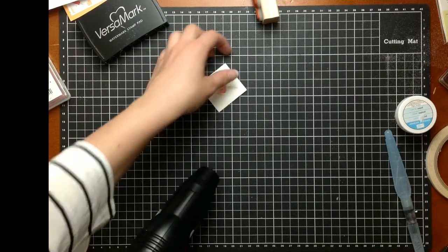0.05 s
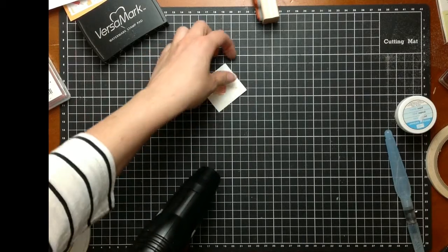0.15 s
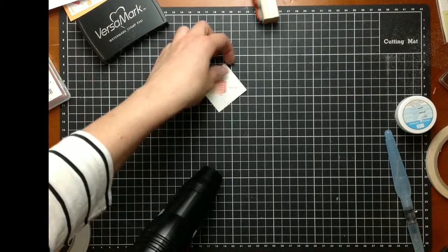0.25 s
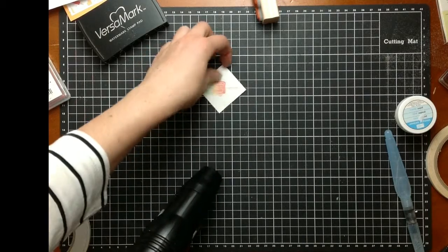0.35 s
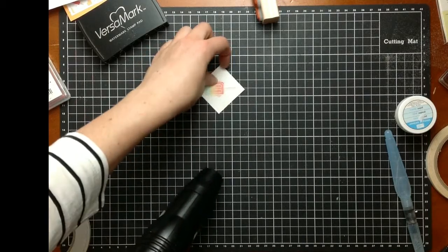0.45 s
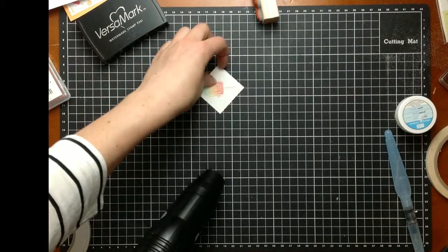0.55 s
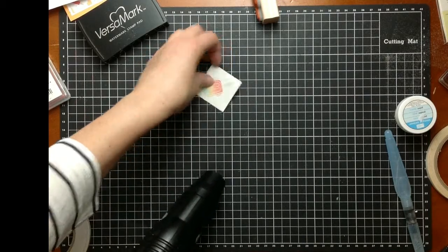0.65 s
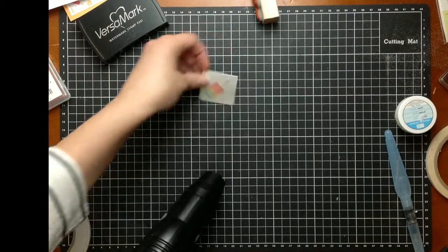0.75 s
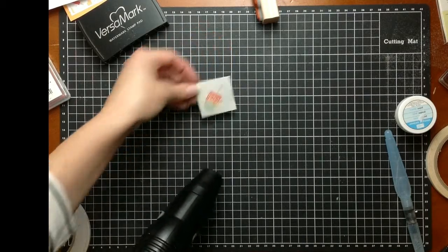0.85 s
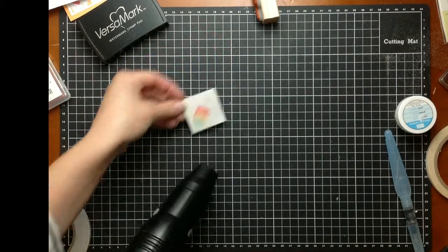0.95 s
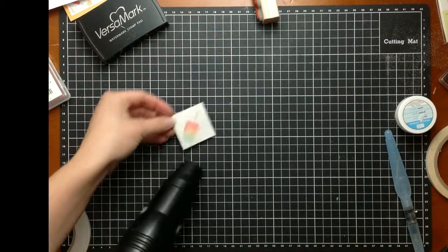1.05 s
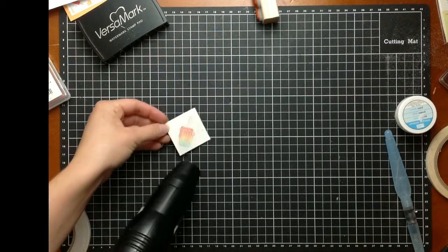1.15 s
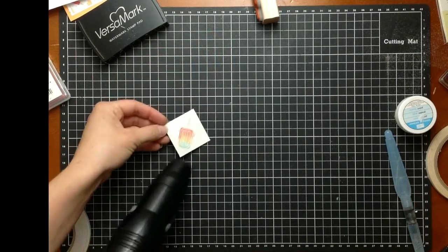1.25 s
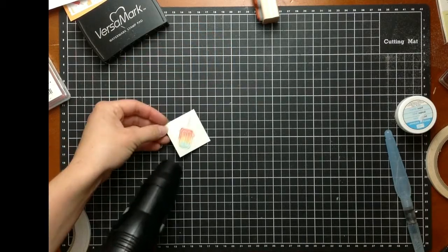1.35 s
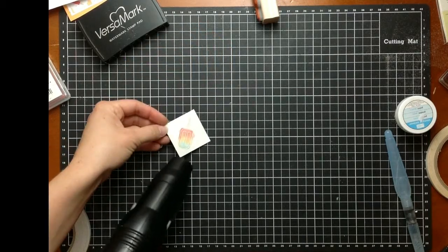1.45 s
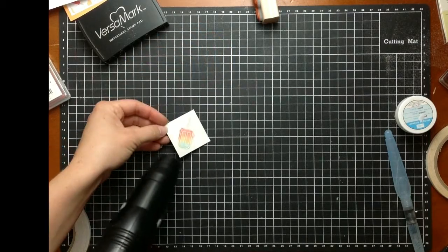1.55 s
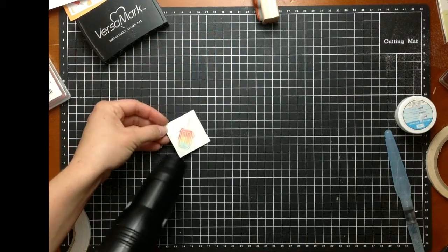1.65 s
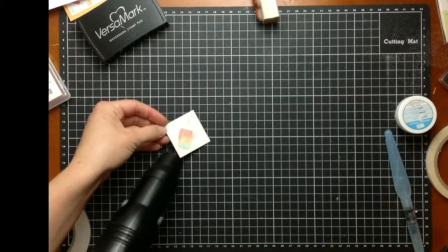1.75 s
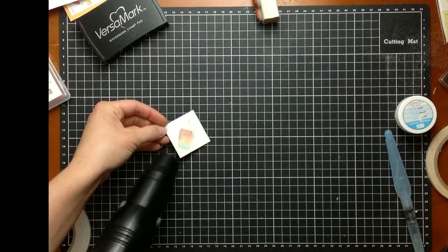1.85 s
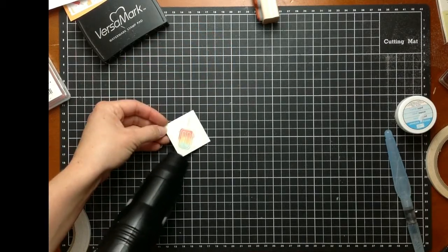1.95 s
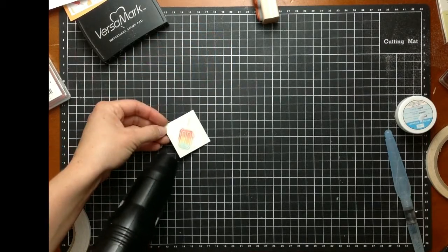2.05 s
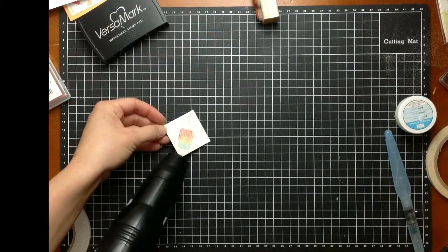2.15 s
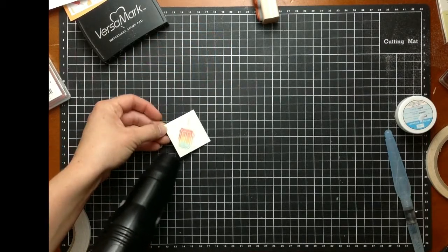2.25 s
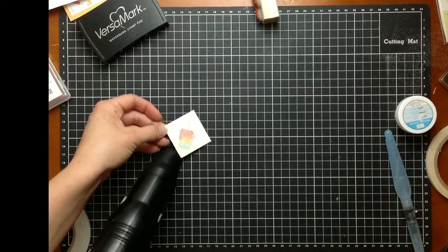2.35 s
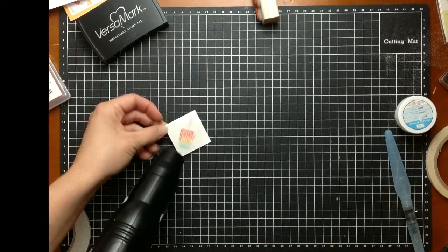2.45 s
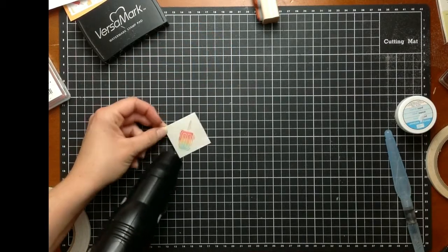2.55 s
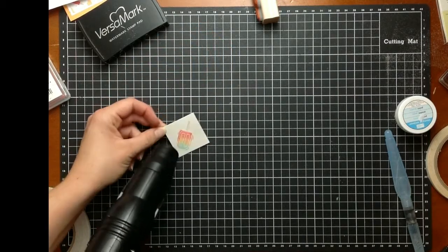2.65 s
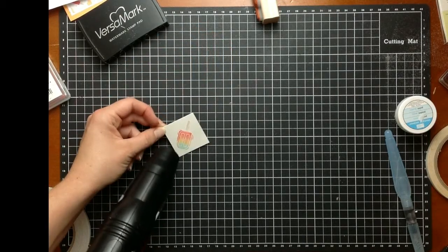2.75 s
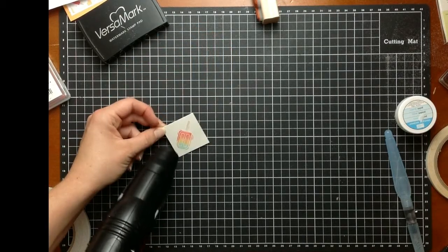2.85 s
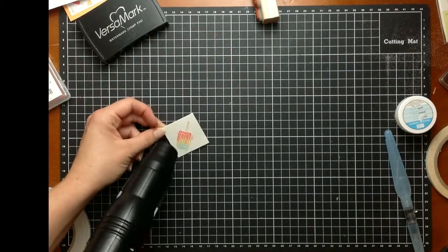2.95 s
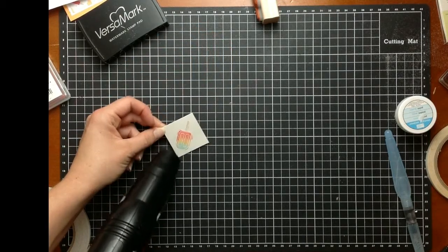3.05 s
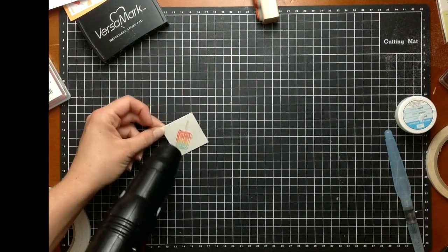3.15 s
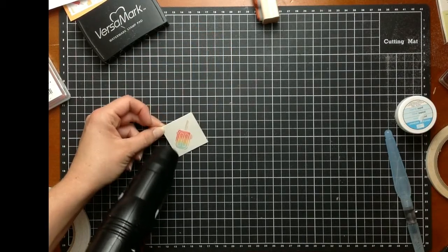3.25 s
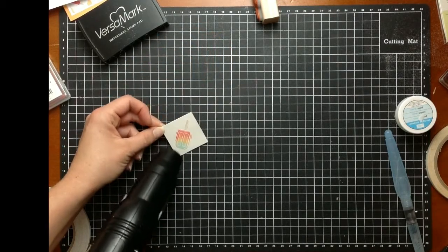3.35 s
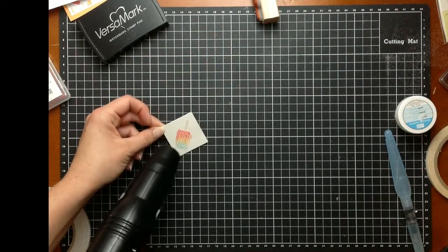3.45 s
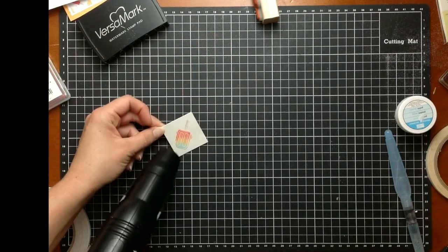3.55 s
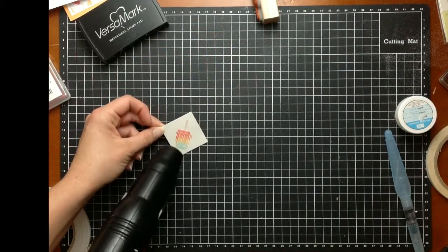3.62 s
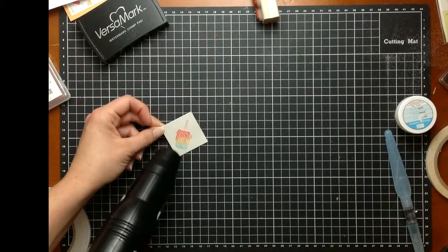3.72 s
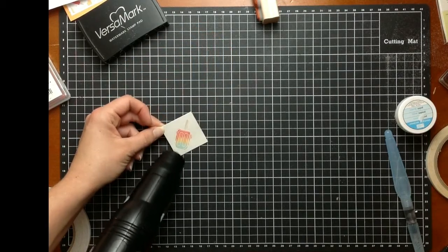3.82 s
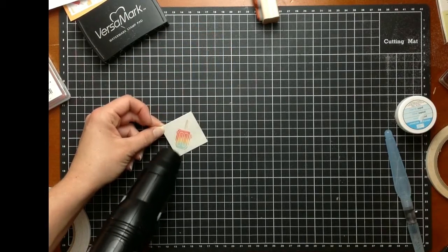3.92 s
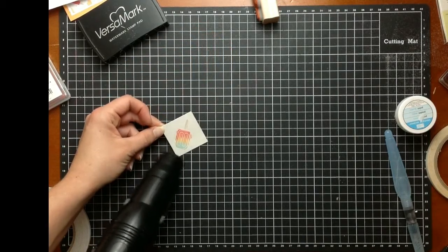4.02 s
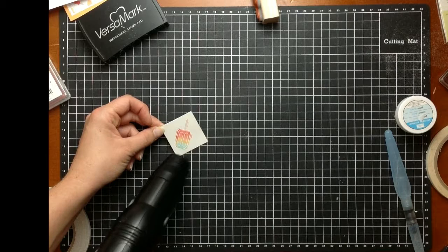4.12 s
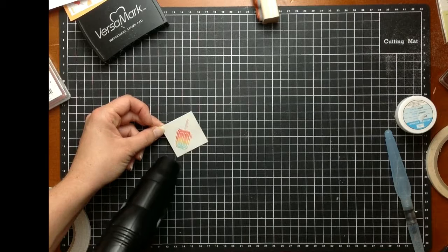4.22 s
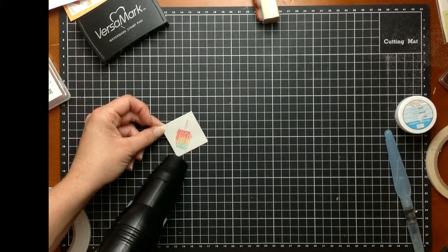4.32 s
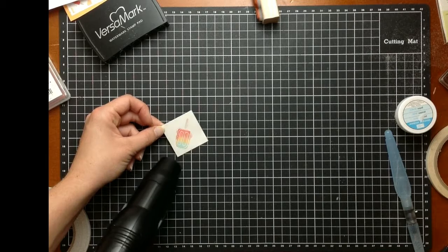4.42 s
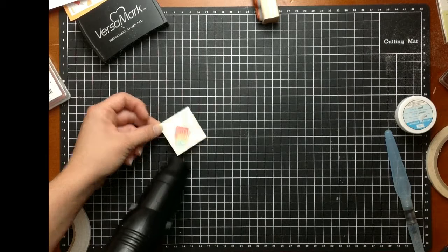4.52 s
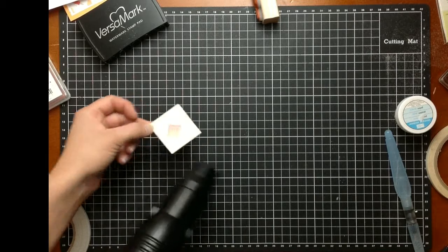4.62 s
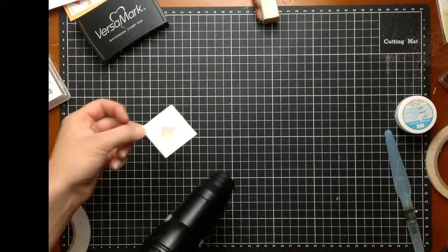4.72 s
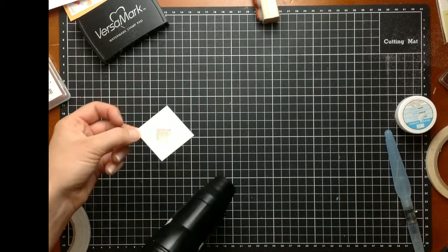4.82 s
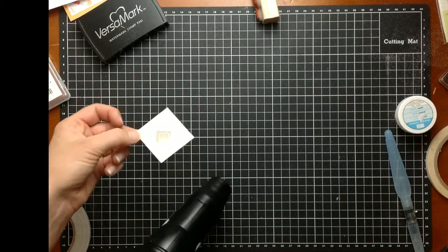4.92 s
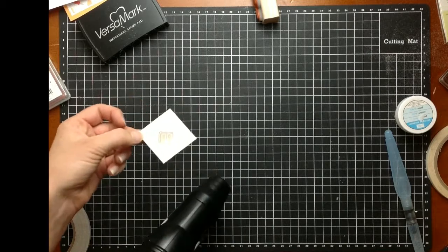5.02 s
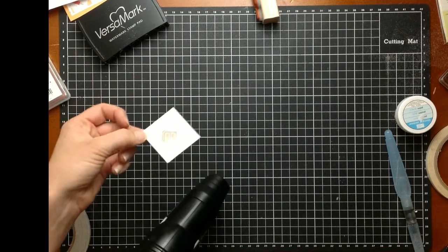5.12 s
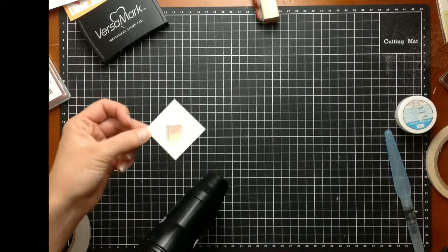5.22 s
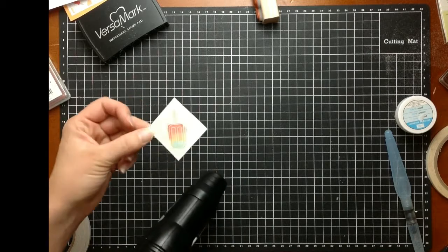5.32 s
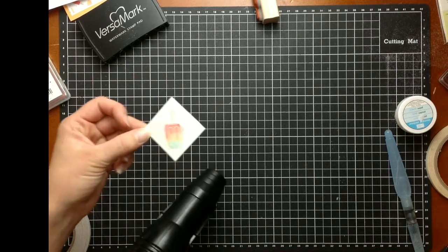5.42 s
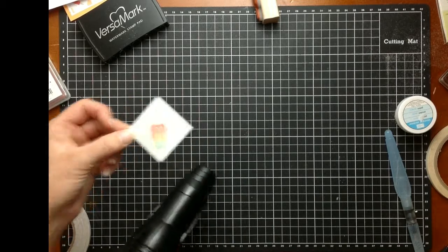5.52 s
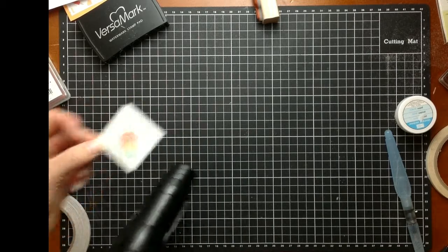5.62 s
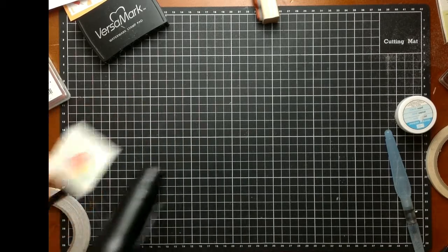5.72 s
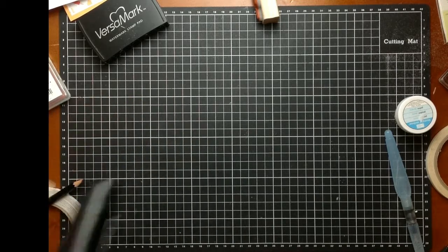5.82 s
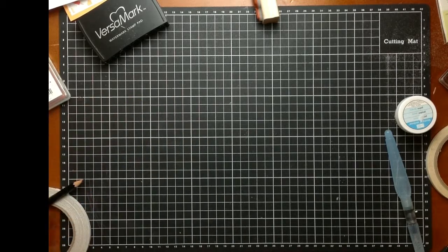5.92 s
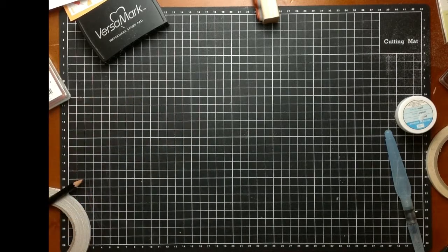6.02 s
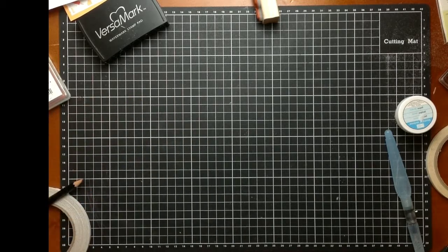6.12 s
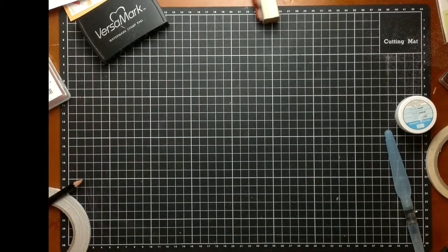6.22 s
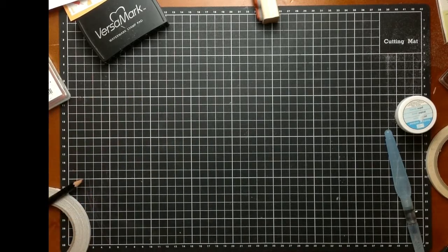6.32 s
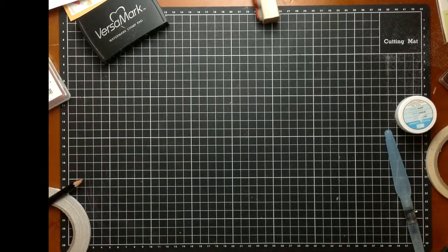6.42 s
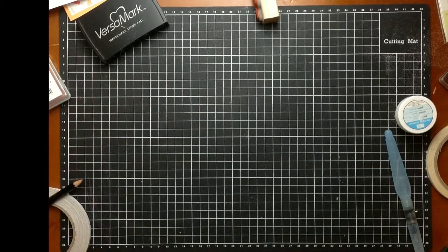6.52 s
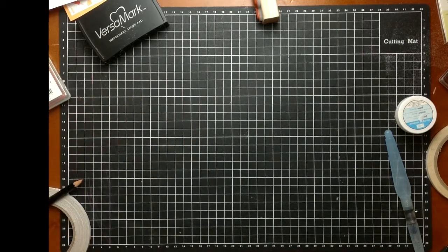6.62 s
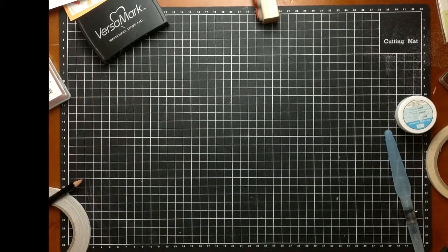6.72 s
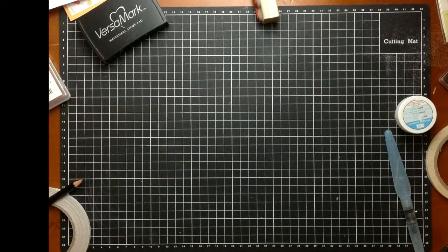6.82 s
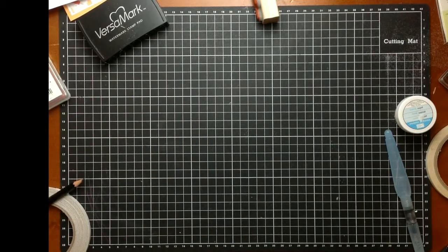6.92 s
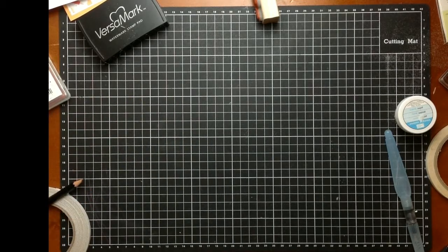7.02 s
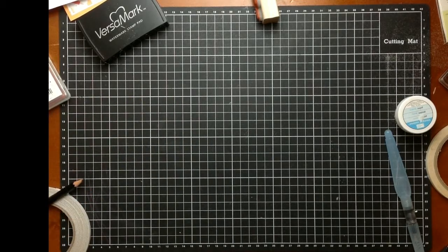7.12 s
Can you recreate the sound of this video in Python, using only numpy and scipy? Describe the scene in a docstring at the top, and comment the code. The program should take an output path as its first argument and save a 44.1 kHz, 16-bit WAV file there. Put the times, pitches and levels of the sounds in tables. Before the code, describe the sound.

Steady airy roar, bright hiss and fan whine of a small heat blower, gliding down to quiet before plastic clacks and knocks.

```python
"""A craft heat tool blows at a scrap of paper: air roars in its barrel, the jet hisses, a small fan whines.
Resonance colours the roar; echoes recolour the hiss as the nozzle meets the paper and leaves it; the whine
is a harmonic series on the shaft rate. Switched off, the fan coasts to rest and its pitch glides down.
The tool is put aside: a faint rub, then plastic clacks (clicks, rattle, damped rings) and knocks on the table
(damped modes), in a small, lively room over steady quiet noise."""
import sys
import numpy as np
from scipy import signal
from scipy.fft import rfft, irfft, next_fast_len
from scipy.io import wavfile
from scipy.ndimage import map_coordinates

SR = 44100
rng = np.random.default_rng(int(sys.argv[2]) if len(sys.argv) > 2 else 0)


def output_pcm(signal):
    """Save a mono or channel-first signal as 16-bit PCM at the path in sys.argv[1].

    Samples are clipped to [-1, 1] before scaling.
    """
    pcm = np.clip(np.atleast_2d(signal).T, -1, 1) * 32767
    wavfile.write(sys.argv[1], SR, np.round(pcm).astype(np.int16))


N = 316197


def amp(db):
    """Level law: decibels to amplitude gain."""
    return 10 ** (np.asarray(db) / 20)


def unit(x):
    """Normalisation: x at rms 1."""
    return x / np.sqrt(np.mean(x ** 2) + 1e-20)


def seconds():
    """Time axis of the whole scene in seconds."""
    return np.arange(N) / SR


def along(points, hz):
    """Interpolation of (Hz, value) points on a logarithmic frequency axis."""
    point_hz, values = np.transpose(points)
    return np.interp(np.log(hz + 1), np.log(point_hz + 1), values)


def bumps(rows, hz):
    """Sum in dB of Gaussian lifts and hollows, rows of (centre_hz, width_hz, lift_db)."""
    return sum(db * np.exp(-((hz - centre) / width) ** 2) for centre, width, db in rows)


def wobble(rate):
    """Slow random modulation: a smooth curve through random knots, rate of them a second."""
    knots = rng.standard_normal(int(N * rate / SR) + 4)
    return map_coordinates(knots, [np.arange(N) * rate / SR])


def filtered(x, response):
    """Linear filtering: the spectrum of x times a response of frequency."""
    size = next_fast_len(len(x) + SR // 2)
    spectrum = rfft(x, size) * response(np.fft.rfftfreq(size, 1 / SR))
    return irfft(spectrum, size)[:len(x)]


def noise(colour_db, size=N):
    """Coloured noise: white noise shaped by a function from Hz to dB, at rms 1."""
    return unit(filtered(rng.standard_normal(size), lambda hz: amp(colour_db(hz))))


def ringing(modes, t):
    """Modal decay: damped sines, rows of (mode_hz, level_db, t60_s)."""
    return sum(amp(db - 60 * t / t60) * np.sin(2 * np.pi * hz * t) for hz, db, t60 in modes)


def snap(colour_db, size=4096):
    """Minimum-phase impulse: the shortest click that has a given colour, at peak 1."""
    log_spectrum = np.log(amp(colour_db(np.fft.rfftfreq(size, 1 / SR))) + 1e-6)
    cepstrum = irfft(log_spectrum)
    # folding the cepstrum onto positive times gathers the energy at the start
    click = irfft(np.exp(rfft(2 * cepstrum[:size // 2], size)))
    return click / abs(click).max()


def add(track, s, sound):
    """Superposition: mix a sound into the track at time s."""
    start = round(s * SR)
    track[start:start + len(sound)] += sound[:len(track) - start]


# room tone and microphone hiss: (freq_hz, relative density_db per Hz)
QUIET_COLOUR = [(25, -24), (70, -16), (130, 4.5), (220, 8.5), (550, 1.5), (900, -2), (2000, -4.5),
                (6000, -7.5), (15000, -9)]


def room_tone(level_db=-63.5):
    """Stationary noise: the steady floor of room tone and microphone hiss."""
    return amp(level_db) * noise(lambda hz: along(QUIET_COLOUR, hz))


# reverberation time of the room: (freq_hz, t60_s)
ROOM_DECAY = [(150, 1), (1000, 0.52), (4000, 0.46), (8000, 0.19), (15000, 0.2)]


def room(x):
    """Reverberation: convolution with a noise tail in which each frequency dies at its own speed."""
    hz, t, bands = signal.stft(rng.standard_normal(SR // 2), SR, nperseg=256)
    decay = amp(-60 * t / along(ROOM_DECAY, hz)[:, None])
    tail = signal.istft(bands * decay, SR, nperseg=256)[1]
    return signal.fftconvolve(x, tail / np.linalg.norm(tail))[:len(x)]


RUB_PEAK_S, RUB_DB = 6.79, -59.5  # the rubbing is strongest here
RUB_RISE_DB_PER_S, RUB_FALL_DB_PER_S = 68, 38
# colour of the rubbing: (freq_hz, relative density_db per Hz)
RUB_COLOUR = [(60, -38), (150, -11), (198, 6), (240, -5), (330, -16), (600, -20), (3000, -26)]


def rub():
    """Friction noise: a faint low drone swells and fades while the tool is moved away."""
    t = seconds() - RUB_PEAK_S
    level_db = RUB_DB + np.minimum(RUB_RISE_DB_PER_S * t, -RUB_FALL_DB_PER_S * t)
    return amp(level_db) * noise(lambda hz: along(RUB_COLOUR, hz))


# modes of the table top: (mode_hz, relative level_db, t60_s)
TABLE_MODES = [(185, -6, 0.19), (245, -6, 0.1), (310, -3, 0.07), (398, -10, 0.066), (495, -7, .11),
               (560, -2, 0.12), (720, -9, .06)]
# the tool's weight lands just after contacts: (start_s, level_db, favoured pitch_hz of the landing spot)
LANDINGS = [(6.756, -41, 560), (6.905, -42, 480), (7.1372, -23.5, 290), (7.157, -25.5, 430)]


def knocks(rise_s=0.0021, room_db=-9, off_spot_db_per_octave=5):
    """Modal excitation: each landing rings the table top, most in the modes near the spot's pitch."""
    track, t = np.zeros(N), np.arange(SR // 2) / SR
    for s, db, spot_hz in LANDINGS:
        modes = []
        for hz, mode_db, t60 in TABLE_MODES:
            octaves_off = abs(np.log2(hz / spot_hz))
            modes.append((hz, mode_db - off_spot_db_per_octave * octaves_off, t60))
        thud = ringing(modes, t) * (1 - np.exp(-t / rise_s))
        add(track, s, amp(db) * (thud + amp(room_db) * room(thud)))
    return track


# colour of the plastic shell: (freq_hz, relative density_db per Hz)
SHELL_COLOUR = [(40, -36), (130, -26), (220, -4), (500, 3.5), (950, 3), (1600, 2.5), (2600, 0.5),
                (3700, -0.5), (5000, 2), (7000, 0.5), (10000, 0), (15000, -4)]
# plastic contacts as the tool is put aside:
# (start_s, level_db, brightness_hz, low_ring_hz, high_ring_hz, ring level_db relative to the contact)
CONTACTS = [(6.279, -46.5, 1350, 750, 1440, -22), (6.297, -50, 1300, 1010, 1460, -24),
            (6.626, -46.5, 6000, 1600, 3370, -24), (6.7453, -29, 6400, 1240, 2900, -17),
            (6.8957, -19.5, 8500, 946, 3450, -14), (7.1317, -17, 12000, 920, 4220, -23),
            (7.1376, -27, 5000, 1440, 3320, -24)]


def clacks(snap_db=1, shell_db=-10, shell_t60=0.055, shell_room_db=14.0, spot_db=4.5, spot_octaves=0.2,
           low_db=-9, low_t60=0.13, high_t60=0.028, rise_s=0.00066):
    """Impact excitation: a snap, a shell rattle, two damped rings of the struck spot and the room's answer."""
    track, t = np.zeros(N), np.arange(SR // 2) / SR
    for s, db, bright_hz, low_hz, high_hz, ring_db in CONTACTS:
        def colour(hz):
            octaves_off = [np.log2((hz + 1) / centre) for centre in (low_hz, high_hz)]
            spot = sum(spot_db * np.exp(-(octaves / spot_octaves) ** 2) for octaves in octaves_off)
            # a softer contact excites less treble
            softness = 10 * np.log10(1 + (hz / bright_hz) ** 4)
            return along(SHELL_COLOUR, hz) + spot - softness

        rattle = amp(shell_db - 60 * t / shell_t60) * noise(colour, size=len(t))
        room_answer = room(signal.unit_impulse(len(t)))
        echo = amp(shell_room_db) * filtered(room_answer, lambda hz: amp(colour(hz)))
        rings = amp(ring_db) * ringing([(low_hz, low_db, low_t60), (high_hz, 0, high_t60)], t)
        add(track, s, amp(db + snap_db) * snap(colour))
        add(track, s, amp(db) * (rings + (rattle + echo) * (1 - np.exp(-t / rise_s))))
    return track


OFF_S = 5.445  # the switch is released
# time constant of air drag, and time after switch-off until bearing friction has stopped the fan
DRAG_S, STOP_S = 0.58, 2.2


def coast():
    """Rotational damping: share of full speed, 1 under power, then slowed by drag and stopped by friction."""
    drag = np.exp(-np.maximum(seconds() - OFF_S, 0) / DRAG_S)
    friction = np.exp(-STOP_S / DRAG_S)
    return np.maximum((drag - friction) / (1 - friction), 0)


# fan speed under power, wandering a little: (time_s, shaft rate_hz)
SHAFT_RATE = [(0, 288.2), (1.3, 288.0), (1.85, 288.3), (2.35, 288.0), (2.8, 287.5), (3.7, 287.1),
              (4.1, 287.1), (4.55, 287.5), (5.4, 286.9)]


def shaft_angle(drift=1):
    """Phase as the integral of frequency: the shaft's angle in radians as it runs and coasts."""
    rate_hz = np.interp(seconds(), *np.transpose(SHAFT_RATE))
    return 2 * np.pi * np.cumsum(rate_hz * coast() * drift) / SR


TONES_END_S, IDLE_FALL_DB_PER_S = 6.09, 154


def settle():
    """Exponential decay: gain with which idling tones and blade wakes die away once the fan is slow."""
    return amp(-IDLE_FALL_DB_PER_S * np.maximum(seconds() - TONES_END_S, 0))


IDLE_HISS_DB, IDLE_HISS_END_S = -60, 6.17
# power of fan speed that the tones follow, its growth per multiple (high tones fade first)
TONES_FADE, FADE_PER_ORDER = 1.4, 0.045
TONES_BLUR = 0.45  # phase scatter in radians
# tones of the idling motor: (multiple of the shaft rate, level_db at full speed before the casing)
MOTOR_TONES = [(4, -61), (5, -55), (8, -55), (10, -54), (11, -59), (15, -58), (16, -54), (17, -58),
               (18, -56), (19, -55), (20, -56), (23, -61), (25, -60), (30, -55), (32, -54), (34, -55)]
# resonances and hollows of the motor casing: (centre_hz, width_hz, lift_db)
CASING_RESPONSE = [(570, 130, 2), (900, 70, 5), (1400, 130, 5), (1830, 50, 9), (2500, 350, -4),
                   (2900, 70, 5), (3600, 200, 2), (4450, 300, 10), (5350, 300, -13), (8500, 1300, -10)]
# colour of the idling motor's hiss: (freq_hz, relative density_db per Hz)
MOTOR_HISS_COLOUR = [(2000, -12), (4700, 1), (5400, -9), (8000, 3), (11000, -7), (15000, -6)]


def idle(wet_db=-2, bare_s=0.06):
    """Source and resonator: a thin hiss, and blurred tones after switch-off that fall through the casing."""
    speed, turn, t = coast(), shaft_angle(), seconds()
    tones = np.zeros(N)
    for order, db in MOTOR_TONES:
        level = amp(db) * speed ** (TONES_FADE + FADE_PER_ORDER * order)
        phase = order * turn + rng.uniform(0, 2 * np.pi) + TONES_BLUR * wobble(90)
        tones += np.sqrt(2) * level * np.sin(phase)
    # the dying air lays the tones bare
    laid_bare = np.clip((t - OFF_S) / bare_s, 0, 1)
    tones = filtered(tones * laid_bare * settle(), lambda hz: amp(bumps(CASING_RESPONSE, hz)))
    hiss_db = IDLE_HISS_DB - IDLE_FALL_DB_PER_S * np.maximum(t - IDLE_HISS_END_S, 0)
    hiss = amp(hiss_db) * noise(lambda hz: along(MOTOR_HISS_COLOUR, hz))
    return hiss + tones + amp(wet_db) * room(tones)


# how the housing lets out the swish of the blades: (freq_hz, relative gain_db)
HOUSING_RESPONSE = [(150, -48), (330, 6), (600, 11), (1000, -6), (1900, 5), (2500, -1), (3600, 6.5),
                    (4600, 2.5), (5300, -10), (7000, 1), (15000, -13)]


def swish(db=-41.0, ripple_db=6, fade=2.5, edge_hz=10200):
    """Wake noise: noise bunched around shaft harmonics slides down and darkens with the fan's speed."""
    shaft_hz = SHAFT_RATE[-1][1]

    def colour(hz):
        ripple = ripple_db * np.cos(2 * np.pi * hz / shaft_hz)
        return ripple - 10 * np.log10(1 + (hz / edge_hz) ** 20)

    speed = coast()
    # reading the noise ever more slowly lowers its pitch
    sliding = map_coordinates(noise(colour), [np.cumsum(speed)])
    sliding = sliding * speed ** fade * settle()
    return amp(db) * unit(filtered(sliding, lambda hz: amp(along(HOUSING_RESPONSE, hz))))


# the hand brings the nozzle from the mat near the paper, then close on it, then turns it aside:
# (start_s, length_s)
NOZZLE_MOVES = [(0.855, 0.23), (2.504, 0.26), (4.624, 0.15)]


def aim():
    """Piecewise-linear motion: nozzle place 0 over the mat, 1 near the paper, 2 close on it, 3 aside."""
    t = seconds()
    return sum(np.clip((t - s) / length_s, 0, 1) for s, length_s in NOZZLE_MOVES)


def facing(place):
    """Linear crossfade: share 0-1 with which the nozzle points at one place."""
    return np.clip(1 - abs(aim() - place), 0, 1)


# tones of fan and motor before the loss of bass: (multiple of the shaft rate,
# level_db over the mat, level_db near the paper, level_db close on it, level_db turned aside)
SHAFT_HARMONICS = [(1, -55, -53, -53, -51.5), (2, -43, -42, -41, -44), (3, -65, -59, -55.5, -54),
                   (4, -46.5, -48, -49.5, -54), (5, -46, -66, -64, -54), (7, -44.5, -51, -46.5, -52),
                   (8, -56, -80, -58, -74), (9, -56.5, -63, -57.5, -73), (10, -54.5, -51, -54, -57),
                   (12, -58, -52, -51, -51), (13, -44.5, -48.5, -50, -45.5), (16, -47, -40.5, -41.5, -51),
                   (21, -54, -53, -54, -55), (24, -50, -51, -46.5, -47), (30, -66, -62, -56, -59),
                   (32, -55, -66, -58, -64)]


def whine(jitter=0.00058, sway_db=1.9, rough=0.25, fan_fade=4, motor_fade=16, wet_db=-6):
    """Harmonic series: shaft multiples, roughened by uneven inflow, glide down as the fan coasts."""
    speed, place = coast(), aim()
    turn = shaft_angle(1 + jitter * wobble(14))
    tones = np.zeros(N)
    for order, *place_db in SHAFT_HARMONICS:
        phase = order * turn + rng.uniform(0, 2 * np.pi) + rough * wobble(45)
        level = amp(np.interp(place, range(len(place_db)), place_db) + sway_db * wobble(5.06))
        # low fan tones outlast the motor's high whine
        fade = fan_fade if order < 11 else motor_fade
        tones += np.sqrt(2) * level * speed ** fade * np.sin(phase)
    # the small fan radiates little bass
    tones = filtered(tones, lambda hz: np.minimum(hz / 285, 1) ** 5)
    # the room smears the falling tones
    return tones + amp(wet_db) * room(tones * np.sqrt(abs(1 - speed)))


def flow(full_db, paper_db, power):
    """Aeroacoustic power law: level in dB follows a power of fan speed, a little louder at the paper."""
    at_paper = facing(1) + facing(2)
    return full_db + paper_db * at_paper + power * 20 * np.log10(coast() + 1e-6)


# level at full speed, gain at the paper, and the power of fan speed that the amplitude follows
HISS_DB, HISS_PAPER_DB, HISS_POWER = -33.5, 0.65, 3.05
# hiss of the bare jet: (freq_hz, relative density_db per Hz)
JET_COLOUR = [(200, -65), (1400, -14), (2200, -1), (2750, -1.5), (3300, 4.5), (4500, 3.5), (5300, 1.5),
              (7500, 1), (10000, 0), (12000, -2), (15400, -3)]
# bands lifted or hollowed by what the nozzle faces: (centre_hz, width_hz,
# lift_db over the mat, lift_db near the paper, lift_db close on it, lift_db turned aside)
ECHO_BANDS = [(2015, 167, 16, -8, -1, 3), (3380, 410, -2.5, -1, 1, -1.5), (4270, 274, 2.5, 7, 6, 0),
              (4690, 230, -1.5, 5, 5.5, 0), (5290, 335, -4, -7.5, -7, -2), (5860, 90, 5, 1, 0, 10),
              (6020, 145, 4.5, 3, 3, 2), (6770, 250, 6.5, 7.5, 9.5, 8), (7220, 220, 1, 1, 5, 6.5),
              (8230, 130, -5, 2.5, -4, 2), (8230, 150, -8, -2, -2, 1), (9200, 130, 2, 0, -2, 3),
              (9830, 500, 3, 1, 5, 1.5), (10700, 300, 1, 1, 1, 2), (12350, 200, -3, -2, -1, 1),
              (12850, 250, 0, 2.5, 0, 3), (13650, 400, 1, 0, 4, 1.5)]


def jet(flutter_db=0.73):
    """Jet noise with reflection: echoes from whatever it faces lift some bands and hollow others."""
    centres, widths, *places = np.transpose(ECHO_BANDS)
    hiss = np.zeros(N)
    for place, lifts in enumerate(places):
        def colour(hz):
            return along(JET_COLOUR, hz) + bumps(zip(centres, widths, lifts), hz)

        # an equal-power crossfade between places
        hiss += np.sqrt(facing(place)) * noise(colour)
    level_db = flow(HISS_DB, HISS_PAPER_DB, HISS_POWER)
    return amp(level_db + flutter_db * wobble(30)) * hiss


GUST_S, GUST_WIDTH_S, GUST_DB = 2.462, 0.02, 3.5


def gust():
    """Gaussian level pulse: the roar swells briefly, in dB."""
    return GUST_DB * np.exp(-((seconds() - GUST_S) / GUST_WIDTH_S) ** 2)


# level at full speed, gain at the paper, and the power of fan speed that the amplitude follows
ROAR_DB, ROAR_PAPER_DB, ROAR_POWER = -31, 0.5, 2.65
# air resonances of barrel and housing: (centre_hz, nominal width_hz, relative level_db)
BARREL_RESONANCES = [(224, 11, -20), (297, 41, -14.5), (321.3, 25, -14), (405, 53, -9.5), (461.4, 27, -3.5),
                     (499, 37, -2), (568, 28.5, 4.5), (625, 24, -4), (680, 36, -9), (820, 30, -37),
                     (1150, 19, -15), (1326, 84, -8.5), (1463, 34, -6.5), (1700, 60, -13), (1813, 80, -10),
                     (2027, 33, -13.5)]
# broad rush of air under those resonances: (freq_hz, relative density_db per Hz)
RUSH_COLOUR = [(30, -52), (80, -49), (130, -20.5), (200, -8), (350, -21), (600, 17), (900, 2), (1100, 5.5),
               (1600, 2.5), (2000, 2), (2400, -16), (3200, -48), (5000, -58)]


def roar(rush_db=-17.5, flutter_db=0.92):
    """Resonance under broadband excitation: turbulence behind the fan rings the air in the barrel."""
    def colour(hz):
        peaks = 0
        for centre, width, db in BARREL_RESONANCES:
            detuning = (hz - centre) / (0.44 * width)
            peaks = peaks + amp(db) ** 2 / (1 + detuning ** 2) ** 2
        rush = amp(rush_db + along(RUSH_COLOUR, hz)) ** 2
        return 10 * np.log10(peaks + rush)

    level_db = flow(ROAR_DB, ROAR_PAPER_DB, ROAR_POWER) + gust()
    return amp(level_db + flutter_db * wobble(24.92)) * noise(colour)


def scene():
    """Superposition: every source reaches one microphone, alike in both channels."""
    put_aside = rub() + knocks() + clacks()
    tool = idle() + swish() + whine() + jet() + roar()
    mono = room_tone() + put_aside + tool
    return np.array([mono, mono])


def record(dry, bass_cut_hz=95, top_hz=15350):
    """Band limitation: the microphone drops the deep bass and keeps nothing above its upper limit."""
    bass_cut = signal.butter(2, bass_cut_hz, "high", fs=SR, output="sos")
    return np.array([filtered(signal.sosfilt(bass_cut, channel), lambda hz: hz < top_hz) for channel in dry])


dry = scene()
out = record(dry)
output_pcm(out)
```